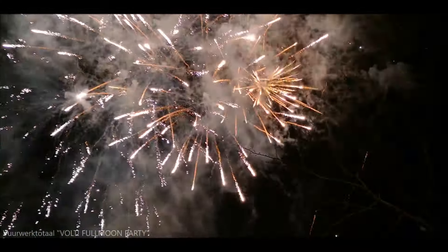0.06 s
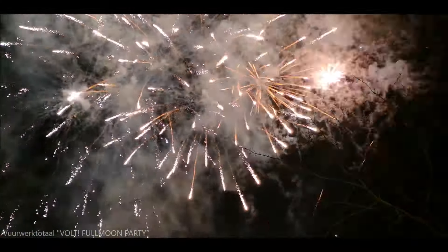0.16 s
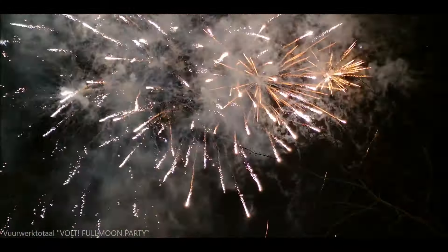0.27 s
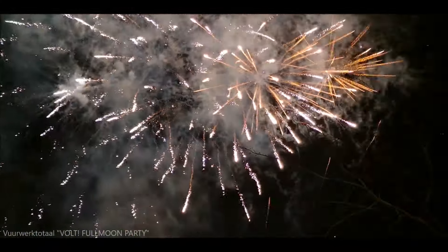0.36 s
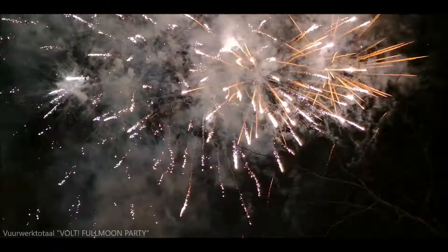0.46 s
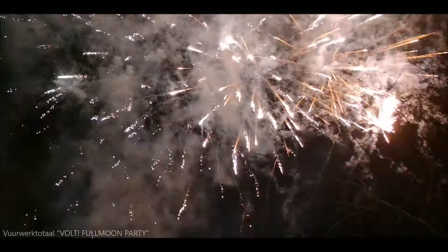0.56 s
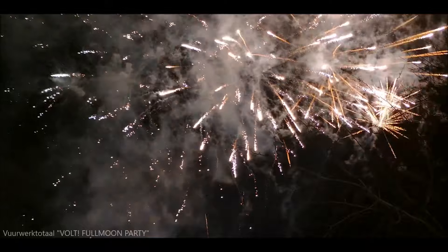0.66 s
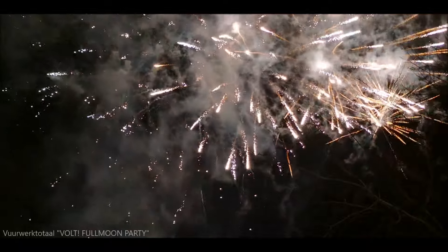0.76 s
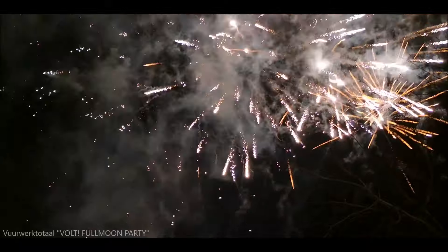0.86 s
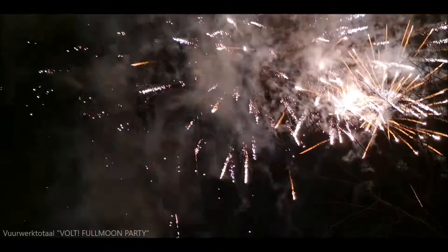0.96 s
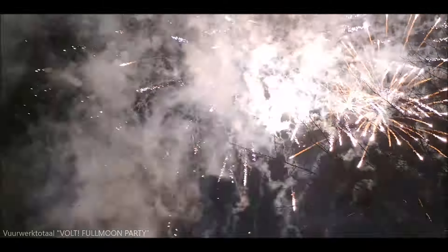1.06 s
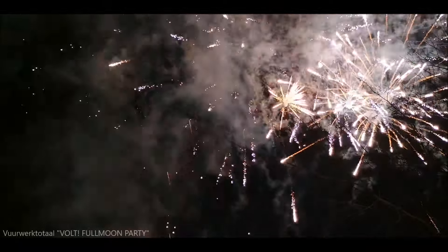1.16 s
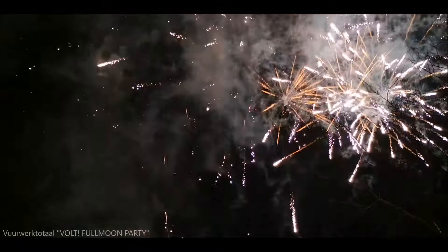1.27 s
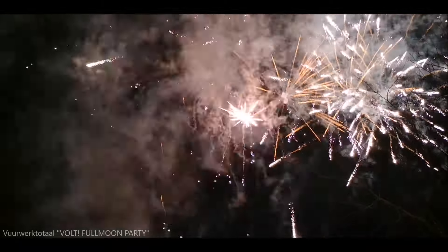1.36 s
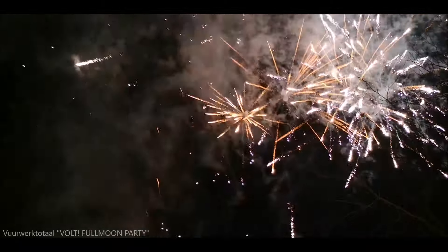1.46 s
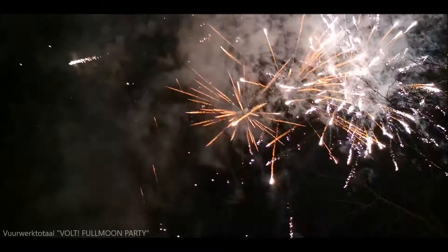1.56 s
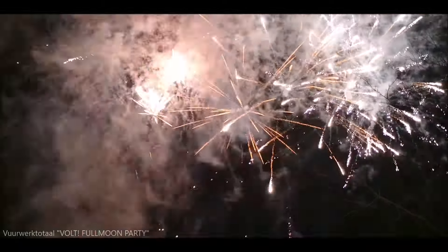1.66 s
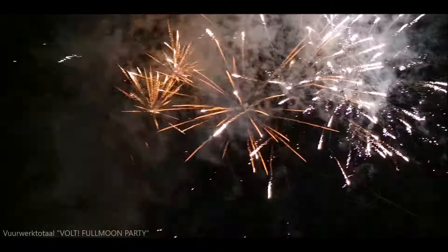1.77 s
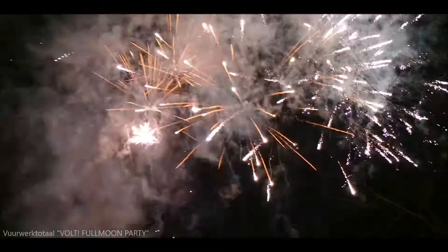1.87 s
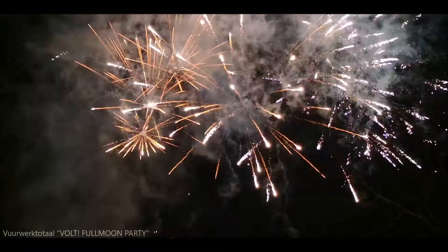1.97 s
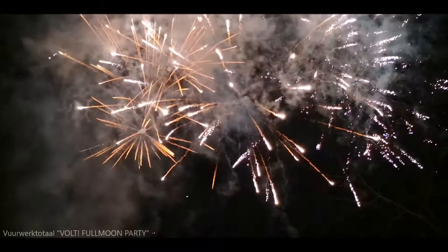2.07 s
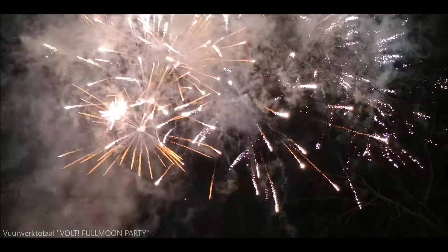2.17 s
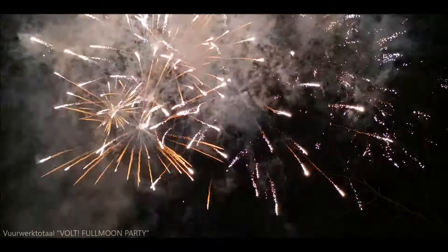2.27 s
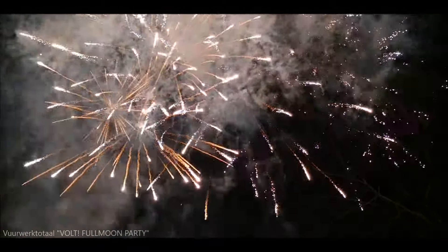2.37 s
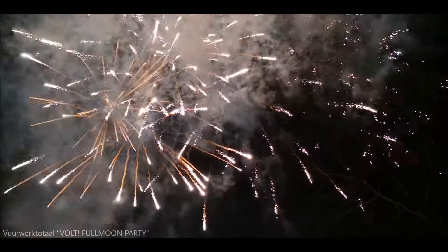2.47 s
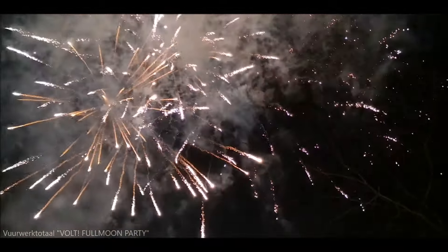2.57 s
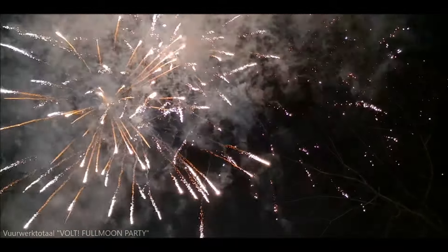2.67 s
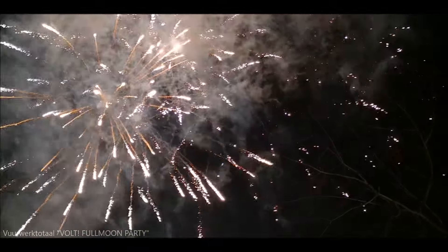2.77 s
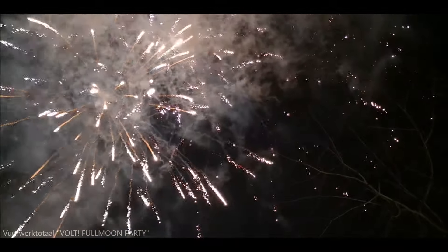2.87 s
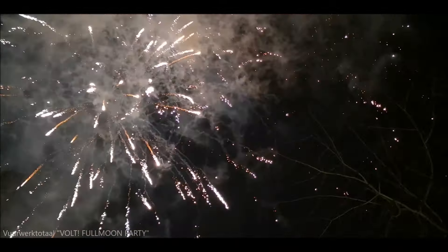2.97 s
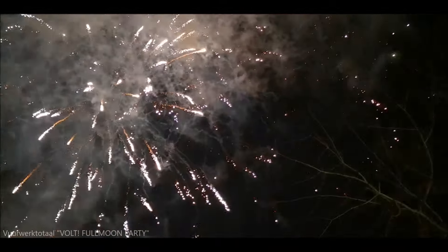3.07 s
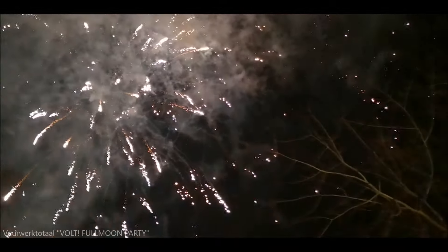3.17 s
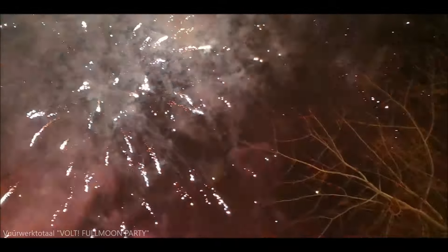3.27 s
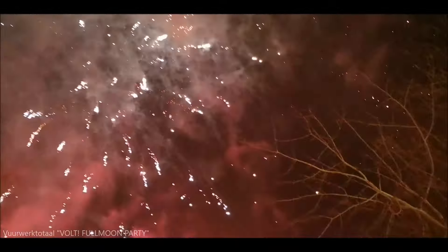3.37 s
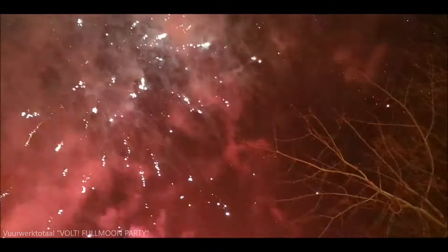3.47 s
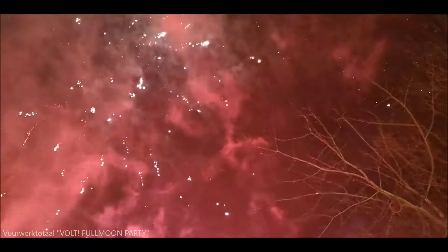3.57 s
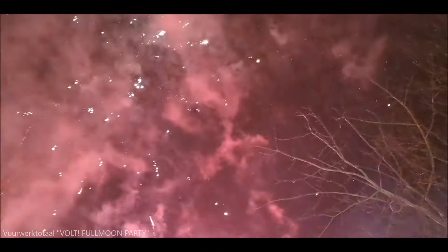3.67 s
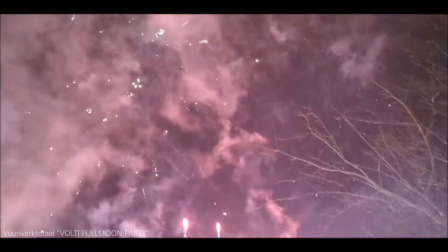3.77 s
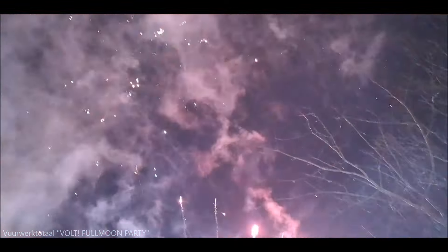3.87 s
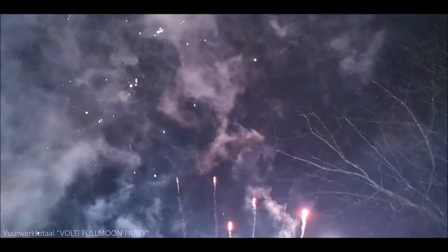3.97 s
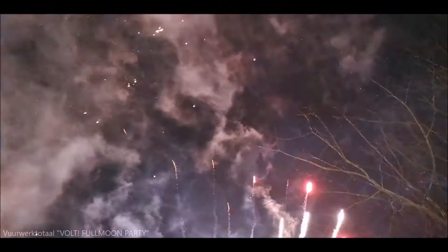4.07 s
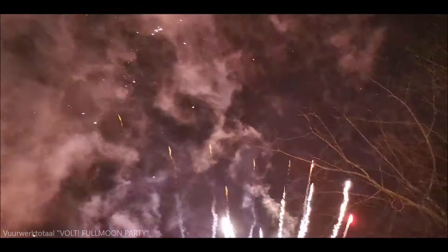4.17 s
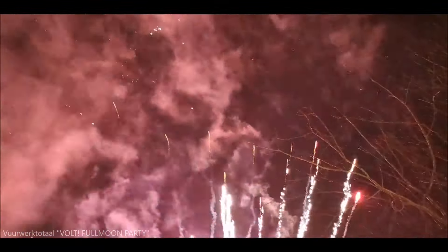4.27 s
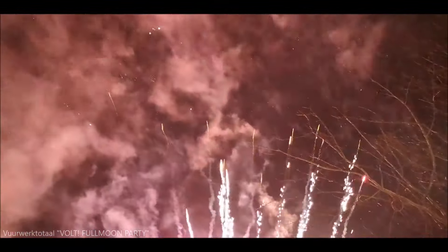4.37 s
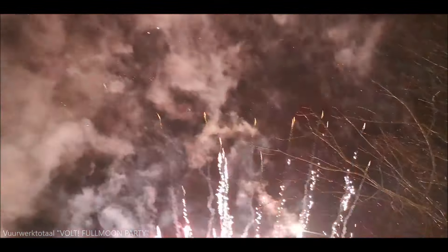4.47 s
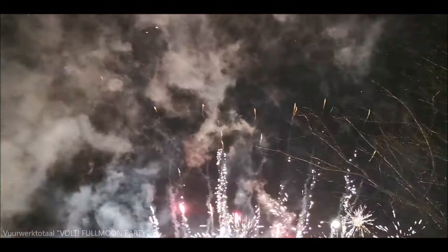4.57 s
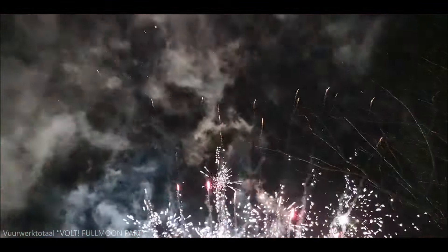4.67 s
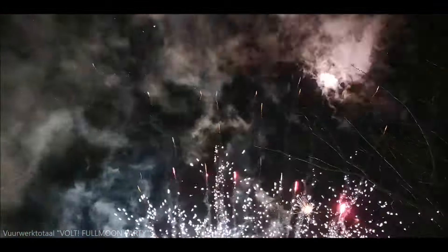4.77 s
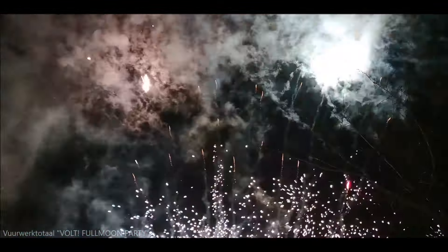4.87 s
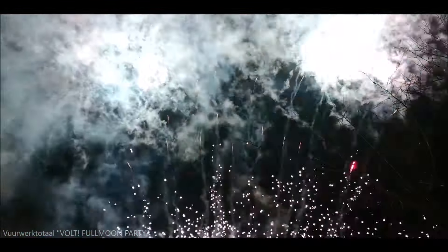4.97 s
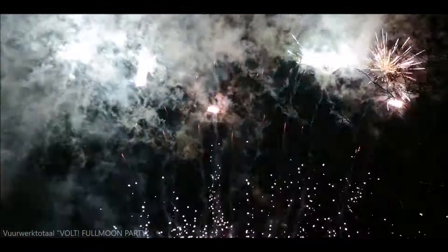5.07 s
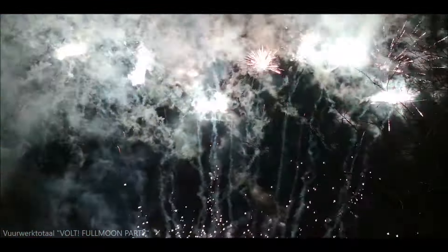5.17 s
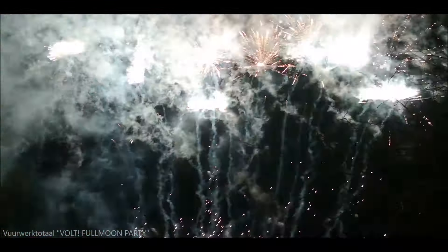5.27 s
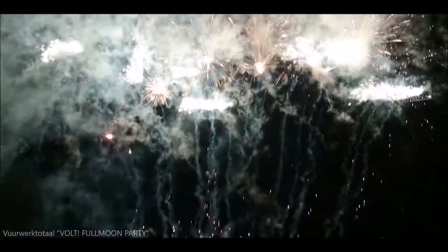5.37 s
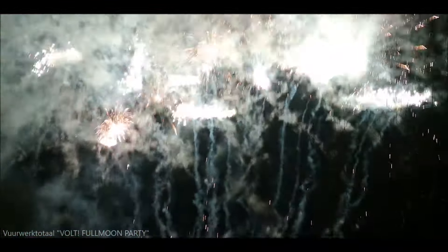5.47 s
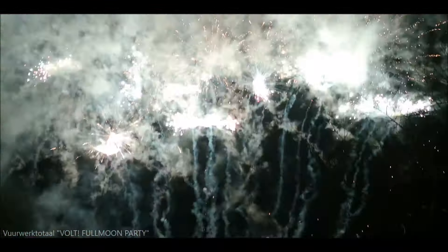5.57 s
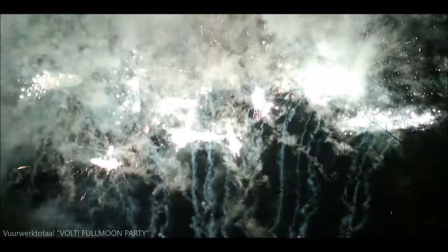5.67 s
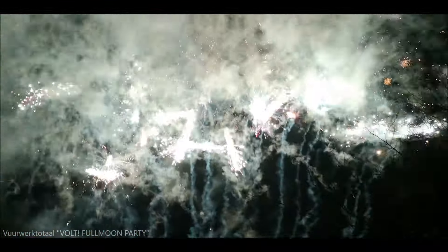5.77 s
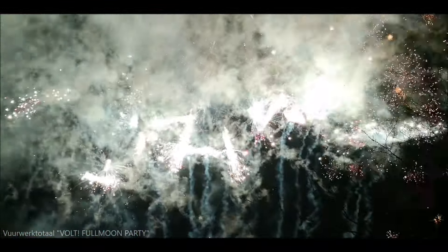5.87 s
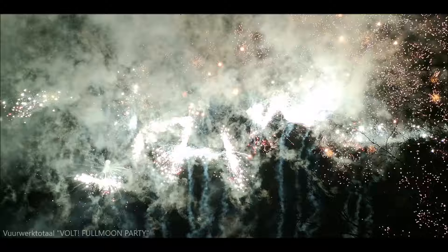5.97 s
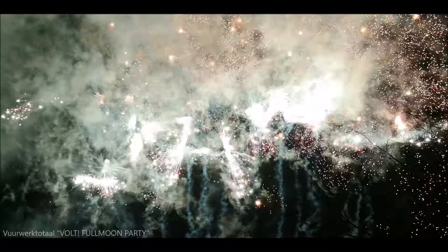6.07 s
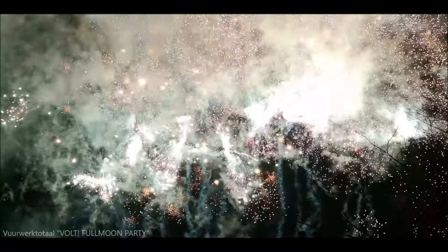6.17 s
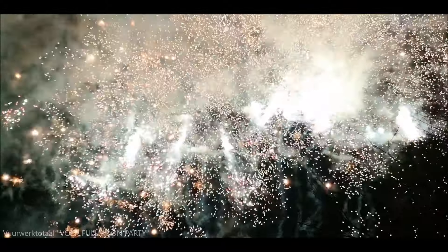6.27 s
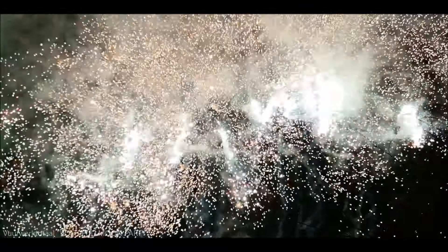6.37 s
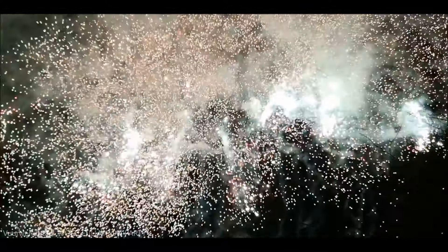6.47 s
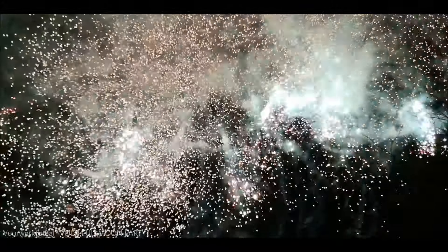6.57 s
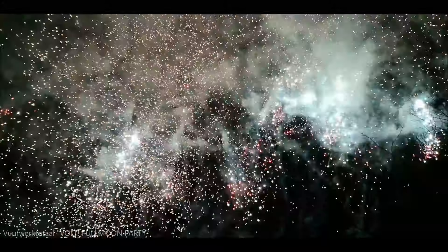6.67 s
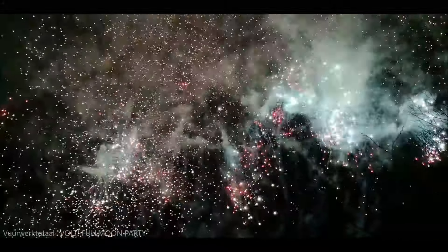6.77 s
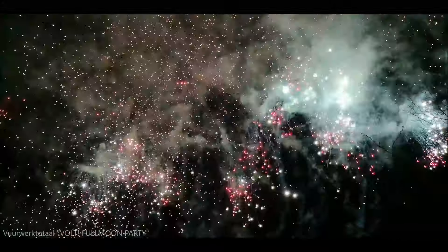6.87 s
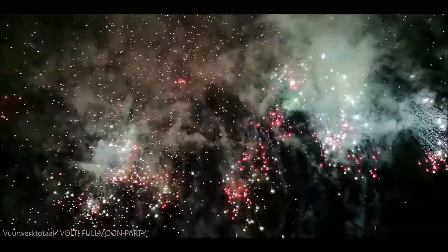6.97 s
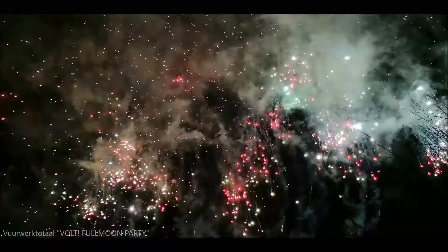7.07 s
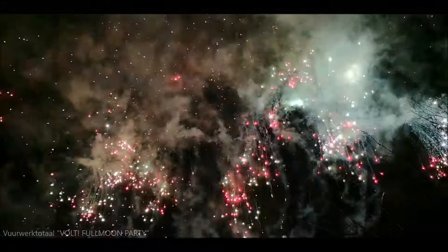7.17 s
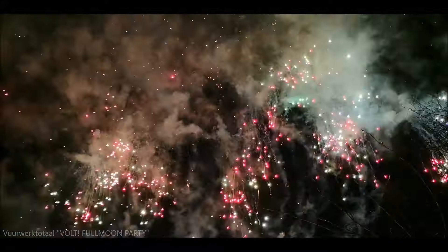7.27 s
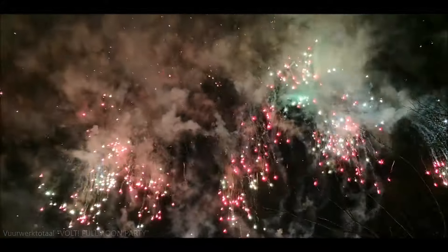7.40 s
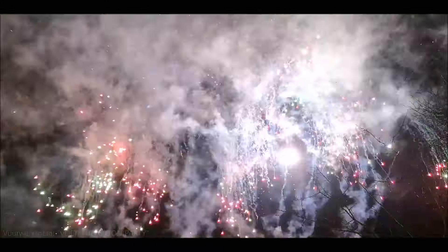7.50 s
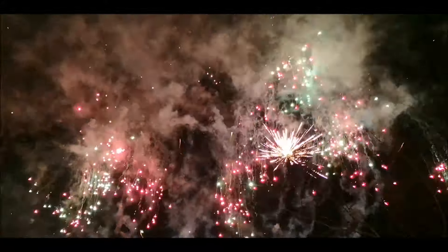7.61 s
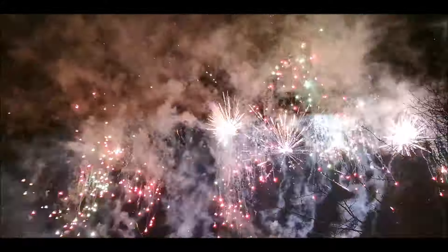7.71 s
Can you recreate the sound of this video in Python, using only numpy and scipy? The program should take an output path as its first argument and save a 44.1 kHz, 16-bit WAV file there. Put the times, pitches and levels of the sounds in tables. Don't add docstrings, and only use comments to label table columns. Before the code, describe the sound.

Multi-shot firework at night: hollow tube thumps and sharp overhead bangs, a rapid row of launches, then crackling star swarms, rumbling echoes and a final bang.

```python
import sys
import numpy as np
from scipy import signal
from scipy.fft import rfft, irfft
from scipy.io import wavfile
from scipy.ndimage import uniform_filter1d, minimum_filter1d

SR = 44100
rng = np.random.default_rng(int(sys.argv[2]) if len(sys.argv) > 2 else 0)


def natural_amplitude(level_db):
    exponent = np.asarray(level_db, float) / 20
    return 10 ** exponent


def store_pcm(level_fs):
    pcm = np.round(np.clip(level_fs, -1, 1) * 32767).astype(np.int16)
    wavfile.write(sys.argv[1], SR, np.atleast_2d(pcm).T)


N = 341325
T = np.arange(N) / SR
LEAD = 100
LOCAL = T[:SR // 3] - LEAD / SR


def shape(points, size=4096):
    hz, db = np.transpose(points)
    f = np.maximum(np.fft.rfftfreq(size, 1 / SR), 1)
    cepstrum = irfft(np.interp(np.log(f), np.log(hz), db) * np.log(10) / 20)
    cepstrum[1:size // 2] *= 2
    cepstrum[size // 2 + 1:] = 0
    h = irfft(np.exp(rfft(cepstrum)))
    return h / h.max()


def ring(x, h):
    lead = np.argmax(h)
    return signal.fftconvolve(np.atleast_2d(x), h[None], axes=1)[:, lead:lead + N]


def unit(x):
    return x / np.sqrt(np.mean(x ** 2))


def cut(x, hz, kind):
    return signal.sosfiltfilt(signal.butter(2, hz, kind, fs=SR, output="sos"), x)


def walk(rate):
    k = int(SR / rate)
    held = np.repeat(rng.standard_normal(N // k + 1), k)
    return 2.27 * uniform_filter1d(uniform_filter1d(held, k), k)[:N]


def strikes(s, db, lag_ms):
    out = np.zeros((2, N))
    for port, side in enumerate((1, -1)):
        at = np.round((s + side * lag_ms / 2e3) * SR).astype(int)
        np.add.at(out[port], np.clip(at, 0, N - 1), natural_amplitude(db) * (at < N))
    return out


def sound(hits, wave):
    return signal.fftconvolve(hits, wave[None], axes=1)[:, LEAD:LEAD + N]


def bell(t, width_s):
    return np.exp(-(t / width_s) ** 2 / 2)


def swell(t, rise_s):
    u = np.maximum(t, 0) / rise_s
    return u * np.exp(1 - u)


def mode(t, hz, rise_s):
    return np.sin(2 * np.pi * hz * t) * swell(t, rise_s)


def port_ring(hits):
    return sound(hits, mode(LOCAL + 0.00018, 7920, 0.00014))


# frequency in Hz, density in dB per Hz.
SCATTER_SPECTRUM = [(200, -81), (550, -34), (950, 6), (1700, 13), (2700, -1), (4100, -5), (7300, -7.5),
                    (9500, -4), (15000, -24), (20000, -25)]


def rattle(hits, decay_s):
    tail = signal.lfilter([1], [1, -np.exp(-1 / (decay_s * SR))], hits)
    return tail * unit(ring(rng.standard_normal((2, N)), shape(SCATTER_SPECTRUM)))


# level in dB per burst, in dB per lift,
# in dB under a swarm, build-up in s, t60 in s.
ECHO_BANDS = [
    (-28, -31.5, -50, 0.072, 2.4),
    (-26, -38, -29, .09, 3.13),
    (-28.5, -41, -8.5, 0.083, 4.36),
    (-24.5, -37.5, -5, 0.023, 1.22),
]
# t60 in s of one band, in
LIFT_T60_S = [.8, 2.5, 5.4, 1.63]
# echoes left by earlier shots and the quiet night floor, dB; then burst dB per dB of trough.
EARLIER_DB, NIGHT_DB, SIZE_LAW = [-27, -30.5, -30.5, -32.5], [-43, -42, -55, -65], 0.51
# time in seconds, gain in dB.
SLOW_GAIN = [(0, 1.5), (.6, 1.1), (1.2, 0), (1.9, 0.4), (2.5, 0.3), (3.3, 2.3), (3.9, 0.8), (4.45, 1.5),
             (4.56, 0.5), (5.1, -1), (5.3, -0.2), (5.7, 0), (6.02, 2.5), (6.09, -5), (6.8, -1.5),
             (7.0, -5.5), (7.1, -5.5), (7.74, -4)]


def returns_db():
    s, trough_db = np.transpose(SHELL_BURSTS)[:2]
    burst = strikes(s, SIZE_LAW * trough_db, 0)[0] ** 2
    lift = strikes(ALL_LIFTS[:, 0], 0, 0)[0]
    swarm = swarm_shape()[0] ** 2
    gain_db = np.interp(T, *np.transpose(SLOW_GAIN))
    out = []
    for band, lift_t60, old_db, night_db in zip(ECHO_BANDS, LIFT_T60_S, EARLIER_DB, NIGHT_DB):
        burst_db, lift_db, swarm_db, build_s, t60 = band
        keep = np.exp(-2 * np.log(1000) / (t60 * SR))
        build = np.exp(-1 / (build_s * SR))
        feed = signal.lfilter([1 - build], [1, -build], natural_amplitude(2 * burst_db) * burst)
        feed += natural_amplitude(2 * swarm_db) * (1 - keep) * swarm
        feed[0] += natural_amplitude(2 * old_db)
        power = signal.lfilter([1], [1, -keep], feed) + natural_amplitude(2 * night_db)
        power += natural_amplitude(2 * lift_db - 0.5) * signal.lfilter([1], [1, -keep ** (t60 / lift_t60)], lift)
        out.append(10 * np.log10(power) + gain_db)
    return out


# frequency in Hz, density in dB per Hz.
RUMBLE_SPECTRUM = [(12, -90), (20, 6), (27, -4), (151, 1.5), (286, -2.5), (644, -13), (698, -12),
                   (900, -16), (1170, -102), (1980, -120)]
# frequency in Hz, density in dB per Hz.
HISS_SPECTRUM = [(300, -38), (600, -19), (1000, -11), (1600, -6.5), (2800, -9), (3400, -15), (4200, -15.5),
                 (7600, -16.5), (9500, -20), (15000, -37), (20000, -49)]


def surroundings():
    deep_db, rumble_db, hiss_db, treble_db = returns_db()
    bass_db, top_db = deep_db - rumble_db, treble_db - hiss_db
    lumps = rng.standard_normal((2, N)) * natural_amplitude(1.5 * walk(40))
    mid, side = unit(ring(lumps, shape(RUMBLE_SPECTRUM)))
    mid = mid + (natural_amplitude(bass_db) - 1) * cut(mid, 163, "low")
    side = 0.14 * side + 2.22 * cut(side, 430, "high")
    rumble = mid + side * np.array([[1], [-1]])
    grain = rng.standard_normal((2, N)) * natural_amplitude(1.0 * walk(60))
    hiss = unit(ring(grain, shape(HISS_SPECTRUM)))
    hiss = hiss + (natural_amplitude(top_db) - 1) * cut(hiss, 3600, "high")
    return natural_amplitude(rumble_db + 3.0) * rumble + natural_amplitude(hiss_db + 3.5) * hiss


# time in seconds, level in dB, pitch in Hz.
HOUSE_BOOMS = [(1.475, -19.5, 140), (1.995, -13, 126), (2.2348, -12.5, 145), (2.5445, -19, 91),
               (5.831, -9.5, 200), (5.848, -14, 170), (5.862, -15.5, 130), (5.884, -19, 170),
               (5.924, -13, 125), (5.944, -11.5, 89), (5.979, -16, 180), (6.003, -24, 100),
               (5.91, -18, 220), (5.936, -18, 300), (5.9658, -18, 310), (5.9874, -10, 350),
               (5.9998, -11.5, 280), (6.0336, -17, 303)]


def booms():
    out, t = np.zeros(N), np.arange(-1000, 1000) / SR
    for s, db, hz in HOUSE_BOOMS:
        i = int(s * SR) - len(t) // 2
        width_s = .55 / hz
        out[i:i + len(t)] += natural_amplitude(db) * np.cos(2 * np.pi * hz * t) * bell(t, width_s)
    return out


def far_wall():
    return sound(strikes(np.array([2.7065]), -13.5, .1), -mode(LOCAL + 0.00056, 430, 0.0012))


# frequency in Hz, density in dB per Hz.
SNAP_SPECTRUM = [(150, -47), (600, -10.5), (1500, 7), (2400, 4), (4200, -3.5), (7800, -5.5), (11000, -15),
                 (16000, -20.5)]


def snap(hits):
    h = shape(SNAP_SPECTRUM)
    return 0.85 * ring(hits, h) + 0.13 * ring(hits[:, ::-1], h)[:, ::-1]


# start in seconds, length in seconds, peak in dB, treble tilt in dB.
STAR_SWARMS = [
    (4.507, 0.42, -17, 1.6),
    (4.934, 0.15, -22, -11),
    (6.021, 0.091, -19, 5),
    (6.102, 0.54, -17, 0.6),
    (6.33, .38, -15, -8),
    (6.687, 0.113, -22, -3),
    (7.006, 0.13, -27.5, 12),
    (7.057, .19, -19, 2),
    (7.206, 0.405, -16, 0.8),
]
SWARM_EDGE_DB, SWARM_PEAK_AT, SWARM_FADE_S = -1.5, 0.38, 0.013
POPS_PER_MS, THIN_PER_MS, THIN_S = 1.1, 0.76, 0.11


def swarm_shape():
    power, rate, top = np.zeros((3, N))
    for s, length_s, db, tilt_db in STAR_SWARMS:
        u = (T - s) / length_s
        rising, falling = 1 - u / SWARM_PEAK_AT, (u - SWARM_PEAK_AT) / (1 - SWARM_PEAK_AT)
        arch = np.where(u < SWARM_PEAK_AT, rising, falling) ** 2
        gate = np.clip(np.minimum(u, 1 - u) * length_s / SWARM_FADE_S, 0, 1)
        own = (gate * natural_amplitude(db + SWARM_EDGE_DB * np.minimum(arch, 1))) ** 2
        power, top = power + own, top + own * natural_amplitude(2 * tilt_db)
        thin = np.interp((1 - u) * length_s, [0, THIN_S], [THIN_PER_MS, POPS_PER_MS])
        rate = np.maximum(rate, (gate > 0) * np.clip(thin, .2, 8))
    return np.sqrt(power), rate, np.sqrt(top / (power + 1e-18))


# time in seconds, peak in dB, left port lag in ms.
SINGLE_POPS = [(4.4688, -2.1, 0.09), (4.4725, -7.5, 0.11), (4.4782, -5.0, 0.07), (4.4819, -8.7, 0.11),
               (4.5105, -1.5, 0.09), (4.5157, -3.4, -0.52), (4.5197, -5.7, 0.11), (4.5277, -3.2, 0.09),
               (4.9217, -6, 0.0), (4.9305, -6, 0.0), (4.9386, -4.5, 0.0), (4.9457, -5.0, 0.0),
               (4.9509, -4.5, -0.02), (4.9574, -1.9, -0.02), (4.9658, -5.3, 0.07), (4.97, -3.2, -0.02),
               (4.9724, -5.0, 0.52), (4.9952, -4.3, 0.5), (5.0003, -5.4, -0.02), (5.0088, -4.8, 0.0),
               (5.0198, -2.8, 0.0), (5.0227, -5.0, 0.0), (5.0292, -5.0, 0.0), (5.0414, -2.3, 0.23),
               (5.0464, -6.4, 0.29), (5.0641, -6.0, 0.0), (5.0691, -9.3, 0.07), (5.151, -0.9, 0.16),
               (5.1557, -6.1, 0.2), (5.3438, -5.6, -0.02),
               (6.0245, -1.4, 0.16), (6.0275, -8.9, 0.18), (6.783, -9.4, -0.02), (6.7869, -9.1, -0.11),
                    (6.8016, -5.9, -0.02), (6.8053, -4.4, 0.0), (6.8098, -7.8, 0.05), (6.8145, -6.6, 0.07),
                    (6.8385, -7.9, -0.14), (6.8453, -7.1, -0.11), (6.8757, -5.3, -0.09),
                    (6.8824, -7.5, -0.07), (6.9743, -0.2, 0.14), (6.9778, -4.5, 0.18), (6.9818, -7.4, 0.14),
                    (6.9872, -5.4, 0.2), (6.9899, -6.0, 0.2), (7.0197, -2.6, 0.09), (7.0234, -2.4, -0.43),
                    (7.0286, -2.9, 0.14), (7.0331, -1.3, 0.09), (7.037, -8.8, 0.11), (7.0467, -1.3, 0.14),
                    (7.6049, -5.2, 0.05), (7.658, -3.2, 0.05), (7.663, -8.5, 0.07), (7.6838, -4.3, 0.05),
                    (7.7108, -3.5, 0.05), (7.7158, -7.9, 0.09)]
ALL_POPS = np.array(SINGLE_POPS)


def crackle():
    draw = rng.random((4, N))
    level, rate, top = swarm_shape()
    hit = draw[0] < rate * 1e3 / SR
    size_db = -3.0 * np.log(1 - .97 * draw[1, hit]) - 10 * np.log10(rate[hit])
    lag_ms = .08 + .5 * (draw[2, hit] - .5)
    ground_s = .004 + .004 * draw[3, hit]
    swarm = strikes(T[hit], size_db, lag_ms) + strikes(T[hit] + ground_s, size_db - 5, lag_ms)
    swarm = snap(swarm)
    swarm = swarm / np.sqrt(np.mean(swarm[:, rate > 0] ** 2))
    swarm = swarm + natural_amplitude(-12.5) * unit(rattle(np.ones((2, N)), .01))
    swarm = swarm + (top - 1) * cut(swarm, 4500, "high")
    hum = cut(cut(draw[3] - .5, 200, "high"), 250, "low")
    swarm = swarm + natural_amplitude(-20.5) * unit(hum)
    single = strikes(*ALL_POPS.T)
    single_pops = natural_amplitude(0.5) * snap(single) + natural_amplitude(-13) * port_ring(single) + natural_amplitude(-18.5) * rattle(single, 0.00093)
    return natural_amplitude(-0.5) * level * swarm + single_pops


def ducking():
    duck_db, release_s = -9, 0.041
    burst_hits = strikes(np.array(SHELL_BURSTS)[:, 0] - .006, 0, 0)[0]
    hits = burst_hits + strikes(ALL_LIFTS[:, 0] - .004, -11.5, 0)[0]
    held = signal.lfilter([1], [1, -np.exp(-1 / (release_s * SR))], hits)
    return natural_amplitude(duck_db * uniform_filter1d(np.minimum(held, 1.3), size=200))


# time in seconds, thump in dB, tube ring in dB, tube pitch in Hz.
LIFT_CHARGES = [(0.113, -1.5, -11.5, 1355), (0.3097, -3, -17, 1300), (0.504, -5.5, -16, 1300.0),
                (0.6785, -1.5, -8, 1350), (0.9767, -11, -7.5, 1330), (3.3564, -6, -1, 1290),
                (3.399, -5.5, -4.5, 1180), (3.444, -5.5, -5.5, 1180), (3.4899, -7, -7.5, 1200),
                (3.5538, -3, -4.5, 1210), (3.5957, -6.5, -7, 1270), (3.6383, -6.5, -7, 1240),
                (3.6796, -13, -6.5, 1280), (3.7282, -9.4, -7, 1370), (3.7647, -5, -5.5, 1320),
                (3.8107, -4, -6.5, 1170), (3.8592, -5, -12, 1100), (3.896, -4, -12, 1120),
                (3.932, -7, -9.5, 1110), (3.9654, -7.5, -8.5, 1300), (4.0126, -9, -6.5, 1270),
                (4.049, -7.5, -5, 1260), (4.102, -7.5, -6, 1360), (4.157, -3.5, -3, 1310),
                (4.19, -6.5, -6.5, 1290), (4.2351, -6, -4, 1320), (4.28, -6.5, -4.5, 1330),
                (4.3278, -10, -7, 1400), (4.3702, -10, -6.5, 1270),
                (6.2986, -8.5, -9, 1550),
    (6.337, -5, -13, 1480),
    (6.3774, -5, -16, 1550),
    (6.422, -3.5, -12, 1450.0),
    (6.4548, -4, -14, 1290),
    (6.4881, -6, -17, 1310),
    (6.5406, -5, -9, 1270),
    (6.5812, -7, -9, 1630.0),
]
ALL_LIFTS = np.array(LIFT_CHARGES)
TUBE_RISE_S, TUBE_LAW = 0.00061, 0.16


def lifts():
    s, thump_db, ring_db, tube_hz = ALL_LIFTS.T
    lag_ms, t = .09, LOCAL[:600]
    thump = np.sin(2 * np.pi * 255 * np.maximum(t + .0007, 0)) * bell(t - .0013, .0014)
    thump = thump - 0.17 * bell(t - .0021, 0.001) + 0.24 * swell(t - .003, 0.0021)
    thump = thump + 0.18 * mode(t + 0.00067, 603, 0.001)
    out = sound(strikes(s, thump_db - 1.5, lag_ms), thump)
    for at, db, hz in zip(s, ring_db, tube_hz):
        rise_s = TUBE_RISE_S * natural_amplitude(TUBE_LAW * (db + 6))
        tube = np.cos(2 * np.pi * hz * t) * swell(t + 0.00043, rise_s)
        tube = tube + 0.22 * np.roll(tube, 165)
        tube = tube + 0.28 * mode(t + 0.00037, 1.8 * hz, 0.0007)
        for port, side in enumerate((1, -1)):
            i = int((at + side * lag_ms / 2e3) * SR) - LEAD
            out[port, i:i + len(t)] += natural_amplitude(db - 1.0) * tube
    muzzle = strikes(s, -7 + 1.3 * rng.standard_normal(len(s)), lag_ms)
    crack = ring(muzzle, shape(SNAP_SPECTRUM)) + natural_amplitude(-5.0) * port_ring(muzzle)
    return out + crack + natural_amplitude(-9.5) * rattle(muzzle, 0.0022)


# time in seconds, suction trough in dB, left port lag in ms, ground echo delay in ms.
SHELL_BURSTS = [(0.1471, -7.6, 0.02, 8.5), (0.3761, -4.6, 0.09, 8.48), (0.7529, -3.4, 0.14, 7.6),
                (0.794, -10.3, 0.16, 7.82), (1.1453, -5.7, 0.14, 7.96), (1.3104, -3.7, 0.18, 8.16),
                (1.5727, -3.0, 0.02, 8.0), (1.8368, -1.8, -0.09, 7.82), (1.8687, -9.2, -0.07, 8.37),
                (2.0727, -3.9, -0.09, 7.44), (2.3848, -1.7, 0.0, 7.53), (5.227, -1.2, 0.27, 8.1),
                (5.3821, -5.2, 0.16, 8.57), (5.4212, -8.3, 0.09, 8.73), (5.4697, -9.5, -0.02, 8.64),
                (5.5245, -9.1, 0.25, 8.55), (5.6006, -5.0, 0.07, 7.98), (5.6693, -7.2, -0.09, 7.6),
                (5.6921, -9.0, 0.0, 8.82), (7.7388, -1.0, 0.0, 8.0)]


def bursts():
    s, trough_db, lag_ms, echo_ms = np.transpose(SHELL_BURSTS)
    echo_s = s + echo_ms / 1e3
    front = strikes(s, -1.0, lag_ms) + strikes(echo_s, -0.88, lag_ms)
    suction = strikes(s, trough_db + 0.95, lag_ms) + strikes(echo_s, 0.28 * trough_db - 7.5, lag_ms)
    wave = -.7 * swell(LOCAL - .0003, 0.0008) - 0.24 * bell(LOCAL - .0022, 0.00097)
    wave = wave - 0.14 * swell(LOCAL, 0.0072)
    rebound = sound(strikes(s, 1.7 * trough_db, lag_ms), .17 * swell(LOCAL - .012, .04))
    push = 0.7 * swell(LOCAL + 0.00018, 0.00009) + 0.26 * mode(LOCAL + 0.000067, 1560, 0.00028)
    h = shape(SNAP_SPECTRUM)
    shock = ring(0.41 * front, h) + sound(front, push) + natural_amplitude(-12.5) * port_ring(front)
    wall = ring(strikes(echo_s + echo_ms / 1e3, -31.0, -lag_ms), h)
    return shock + wall + rebound + sound(suction, wave) + natural_amplitude(-4.5) * rattle(suction, 0.0014)


def scene():
    return bursts() + lifts() + far_wall() + booms() + ducking() * (crackle() + surroundings())


HOLE_DB, HOLE_SPAN_DB = -73.5, 29


def holes(x):
    f, t, z = signal.stft(x, SR, nperseg=1024)
    field = uniform_filter1d(rng.standard_normal(z.shape[1:]), size=5, axis=0)
    field = uniform_filter1d(field, size=3, axis=1)
    quietest = minimum_filter1d(-np.abs(cut(x[0], 500, "low")), size=700)
    calm = quietest[np.minimum(t * SR, N - 1).astype(int)] > -.36
    band = z[:, (f > 9700) & (f < 15200)]
    top_db = 10 * np.log10(np.mean(np.abs(band) ** 2, axis=(0, 1)) + 1e-18)
    patch = field > np.minimum((top_db - HOLE_DB) / HOLE_SPAN_DB, 1 / 12)
    empty = (patch & (f > 9700)[:, None] | (f > 15200)[:, None]) & calm
    return signal.istft(z * np.where(empty, .02, 1), SR, nperseg=1024)[1][:, :N]


def top_cut(x):
    return signal.sosfilt(signal.butter(12, 16370, fs=SR, output="sos"), x)


def record(dry):
    low = signal.sosfiltfilt(signal.ellip(6, .1, 40, 9700, fs=SR, output="sos"), dry)
    heard, knee = low + natural_amplitude(-4.5) * (dry - low), .8
    over = np.maximum(np.abs(heard) - knee, 0)
    soft = np.clip(heard, -knee, knee) + np.sign(heard) * (1 - knee) * np.tanh(over / (1 - knee))
    return top_cut(holes(soft))


dry = scene()
out = record(dry)
store_pcm(out)
```